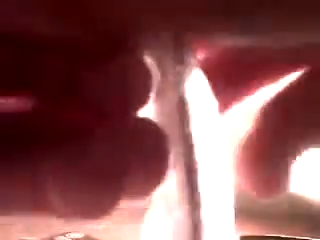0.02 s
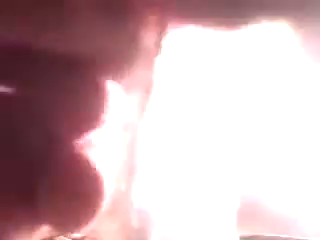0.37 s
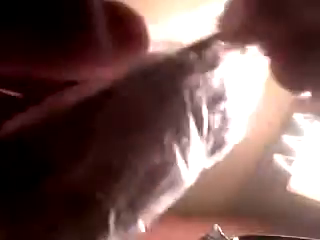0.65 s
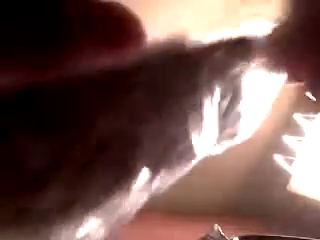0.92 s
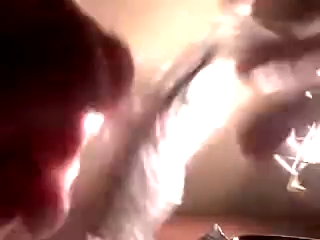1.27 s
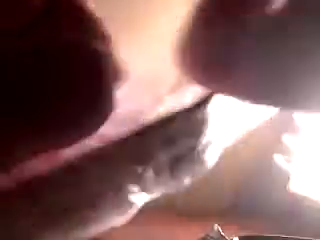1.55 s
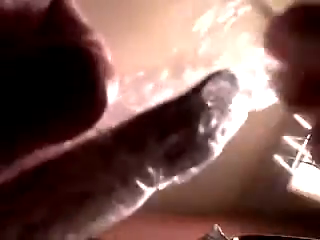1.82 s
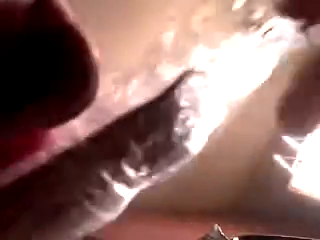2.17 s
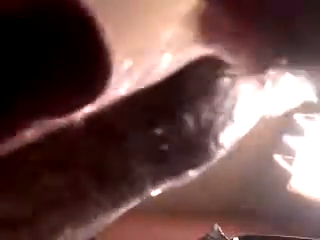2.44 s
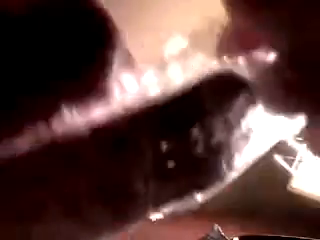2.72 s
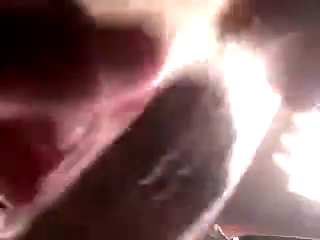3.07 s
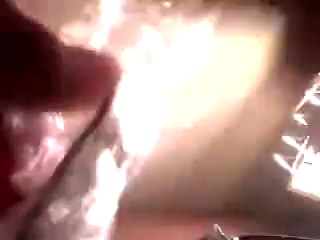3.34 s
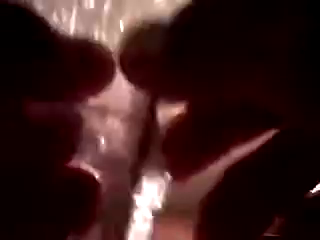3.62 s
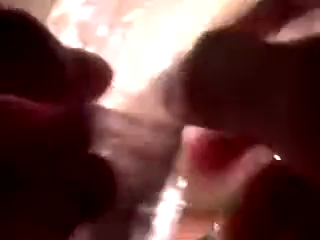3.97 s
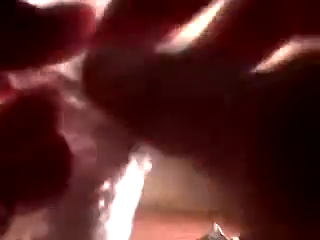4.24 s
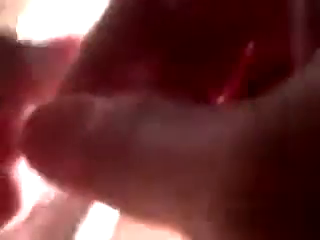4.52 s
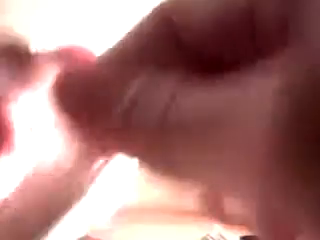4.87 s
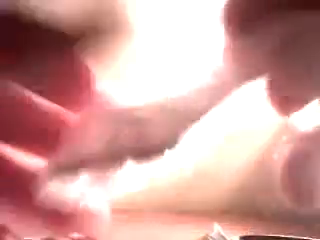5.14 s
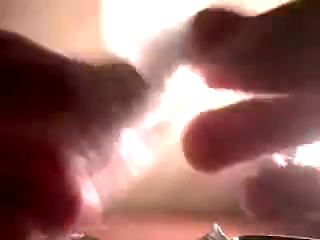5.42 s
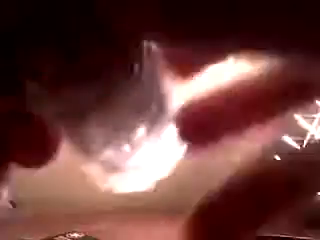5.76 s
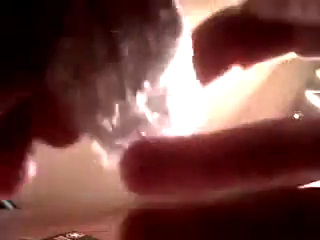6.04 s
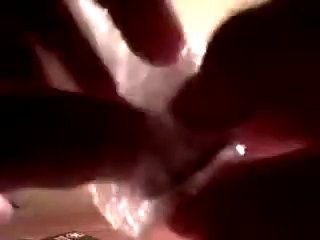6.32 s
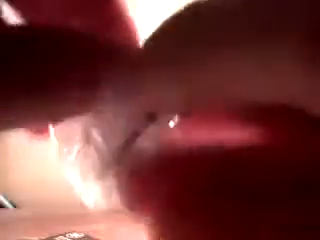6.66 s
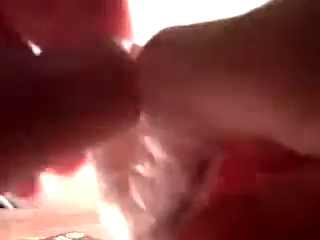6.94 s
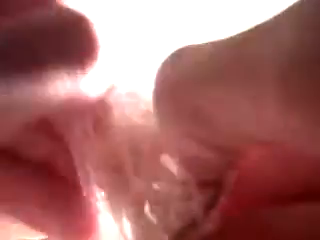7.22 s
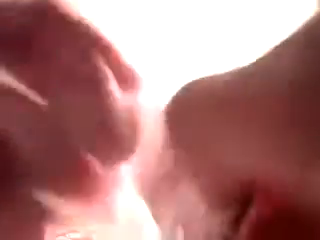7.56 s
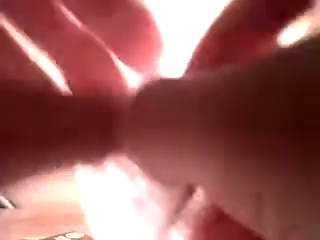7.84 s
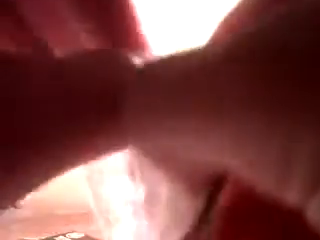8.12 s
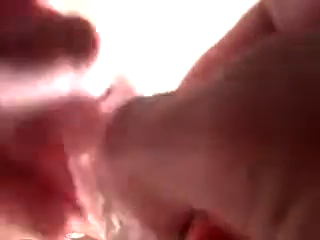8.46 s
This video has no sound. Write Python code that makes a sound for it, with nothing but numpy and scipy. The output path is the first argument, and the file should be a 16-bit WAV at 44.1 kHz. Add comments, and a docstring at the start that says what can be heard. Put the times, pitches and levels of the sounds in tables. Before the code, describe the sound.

Fingers work a clear plastic wrapper open very close to a small microphone. From the start, short uneven pulls make a fine crackle that swells and fades, with sharp snaps as creases flip and a light rustle in between. Loud clusters of snaps come at about 0.7, 1.2 and 1.5 seconds. The crinkling continues in quick bursts, a few snaps carrying a soft low pop, then eases briefly near 4.2 seconds. The pulling resumes, with another loud cluster at 5.2 seconds, busy crackling from about 6.4 to 7.4, and a strong snap at 7.8. The plastic keeps rustling until the end, at around 8.6 seconds. The room is quiet, with only a faint short echo and a steady low rumble. The microphone adds a slight ring in the upper middle range and cuts off the highest treble.

```python
"""Fingers work a plastic wrapper open close to a small microphone, in a quiet room.
From the start, each pull bends tiny patches of the sheet, so a crackle swells and fades.
Creases flip with sharp snaps, in loud clusters near 0.7 s and 1.2 s. The pulls go on, ease off
near 4.2 s, bring more loud snaps at 5.2 s and 7.8 s, and keep the sheet rustling to the end.
All along there is a faint echo and rumble; the microphone rings near 2 kHz and loses the top treble."""
import sys
import numpy as np
from scipy import signal
from scipy.fft import rfft, irfft
from scipy.io import wavfile
from scipy.ndimage import uniform_filter1d

SR = 44100
rng = np.random.default_rng(int(sys.argv[2]) if len(sys.argv) > 2 else 0)


def dump(signal):
    """Clip the signal to [-1, 1] and save it as 16-bit WAV at the path in sys.argv[1]."""
    limited = np.clip(np.atleast_2d(signal).T, -1, 1)
    pcm = np.round(limited * 32767).astype(np.int16)
    wavfile.write(sys.argv[1], SR, pcm)


N = 379260   # 8.6 s

# The main creases flipping, one per row. Levels are relative; the pop is the low thud under the snap.
# Columns: start_s, level_db, pitch_hz, pop_level_db
BIG_SNAPS = [(0.1374, -29.5, 1980, -83), (0.1963, -34.5, 3360, -73), (0.2283, -32, 2980, -82),
             (0.277, -46.0, 1150, -70.0), (0.4449, -31.5, 1930, -60), (0.523, -34, 3300, -83),
             (0.5534, -42.0, 1460, -70), (0.5561, -32, 2540, -82), (0.6257, -31, 3010, -70),
             (0.6402, -29.5, 2240.0, -72), (0.6475, -19, 1610, -64), (0.6574, -20.5, 2780, -76),
             (0.6881, -21.5, 1950.0, -55.5), (0.7379, -35, 2680, -71), (0.7824, -26, 2850, -78),
             (0.8776, -33.5, 3150.0, -81), (0.9285, -39.5, 2300, -72), (1.0734, -34, 2870.0, -74),
             (1.1333, -39, 1400, -69), (1.1757, -28, 2390, -66), (1.1844, -26, 2040, -47),
             (1.1918, -20.0, 1800.0, -55), (1.3258, -54.5, 1040.0, -73), (1.468, -33, 3000.0, -68),
             (1.4745, -28, 2430, -64), (1.4813, -21, 3630, -54), (1.6393, -53.5, 1100.0, -75),
             (1.7266, -31, 2830.0, -67.0), (1.82, -33, 2890.0, -78), (1.8922, -26.5, 2750, -67.5),
             (1.9176, -26.5, 2660, -51.5), (1.9283, -28, 2560.0, -64.0), (1.9887, -32.5, 2600.0, -60.5),
             (2.0273, -31.5, 2890.0, -81), (2.0894, -31, 2260, -48.5), (2.2663, -32, 2080.0, -54.5),
             (2.2911, -35.5, 2600, -55.5), (2.5218, -38, 2630, -46), (2.5273, -25.5, 2250, -67),
             (2.6062, -29.5, 2490.0, -59), (2.6356, -36.5, 2790.0, -80), (2.6859, -32.5, 2690.0, -77),
             (2.7036, -27.5, 2120, -74), (2.7344, -24, 2210, -77), (2.7508, -28, 2480.0, -72),
             (2.7652, -32, 2620.0, -70), (2.8231, -30.5, 2480, -68), (2.8667, -39, 4400.0, -80),
             (3.0256, -31, 3060, -78.0), (3.0805, -33.5, 3270, -83), (3.154, -31, 2400.0, -48.5),
             (3.1701, -34.5, 2060.0, -58), (3.1969, -33.5, 2710, -72.0), (3.2227, -39, 2650.0, -75.0),
             (3.2303, -27, 2150, -74), (3.2754, -30, 2230, -74), (3.3124, -27, 1950.0, -43.0),
             (3.3603, -25, 2550, -62), (3.4215, -33, 2850, -72), (3.4835, -35, 2020, -69),
             (3.814, -29.5, 2650.0, -78), (3.8468, -27.5, 3620.0, -72), (3.9371, -44.0, 1430, -72),
             (4.0037, -29, 2360, -82), (4.017, -28.5, 3000, -86), (4.0617, -22.5, 2180, -63),
             (4.4253, -43.5, 1340, -66), (4.443, -34.5, 2460.0, -61), (4.4918, -28.5, 1950.0, -47.5),
             (4.5195, -31, 3050.0, -69), (4.646, -37, 2100.0, -70), (4.6555, -31.5, 3170.0, -81),
             (4.7154, -33, 3070.0, -75), (4.7264, -34, 2660, -75), (4.7625, -38, 2750.0, -75.0),
             (4.7793, -32.5, 1270, -54.5), (4.788, -27.5, 2600, -77), (4.815, -31, 1950.0, -56),
             (4.8283, -32, 2870.0, -71), (4.9217, -33.5, 1710, -74), (5.0106, -34, 2950, -75),
             (5.1058, -36.5, 2630.0, -75.0), (5.1299, -30.5, 2260.0, -53), (5.1504, -26, 2510, -80),
             (5.1801, -18.5, 2380, -42.0), (5.1914, -22, 2480, -41.5), (5.2054, -26, 2190.0, -55.5),
             (5.4506, -33.5, 2560, -51), (5.5766, -26.5, 3020, -51.5), (5.6395, -31.5, 4300, -77),
             (5.748, -32.5, 3550.0, -82), (5.7945, -31, 3530, -71), (5.835, -40, 2750.0, -76),
             (5.8993, -32.5, 3550, -82), (5.927, -37, 3700, -75), (5.9606, -32.5, 3330, -86),
             (6.0068, -32, 2160, -77), (6.076, -38.5, 2100.0, -80), (6.1554, -29.5, 2780, -78.0),
             (6.329, -37, 2390, -79), (6.3377, -31.5, 2340.0, -77), (6.423, -35, 2150.0, -61),
             (6.4416, -26, 2330.0, -61), (6.4488, -26.5, 3200, -75), (6.4639, -27, 2350.0, -73),
             (6.497, -30, 2200.0, -70.0), (6.5266, -36, 2930.0, -72), (6.5461, -27, 2860.0, -71),
             (6.5554, -43.5, 1150, -71.5), (6.7878, -32, 2750.0, -77.0), (6.7969, -34, 2840.0, -80),
             (6.8608, -26, 2900, -73), (6.8706, -23.5, 2970, -84), (6.921, -34, 2400.0, -76),
             (6.981, -37, 2280.0, -72), (7.0223, -30, 3800, -81), (7.0779, -33, 3340, -83),
             (7.1939, -34, 1940, -71.0), (7.2161, -38, 2880, -75), (7.2582, -30, 2720.0, -62),
             (7.3335, -22.5, 2330, -74.0), (7.3425, -34, 2460.0, -73), (7.357, -25.5, 2200, -72),
             (7.3956, -34, 3870, -71), (7.5171, -32.5, 2500, -75.0), (7.6039, -29, 2520.0, -78),
             (7.6161, -29, 2600, -64), (7.6341, -32, 2670.0, -72), (7.7183, -32, 2200, -74),
             (7.7482, -31.5, 2620.0, -65.5), (7.7833, -31, 2620.0, -80), (7.8091, -18, 2100, -48),
             (7.8302, -26, 2920.0, -71), (7.854, -33, 2780.0, -74.0), (7.8741, -27, 2750, -75.0),
             (7.8787, -24.5, 2460, -79), (7.9114, -35, 2700.0, -75), (7.9407, -27.5, 2400.0, -70),
             (8.062, -36.5, 2430, -81), (8.1753, -32, 2760, -73), (8.4399, -27, 2700, -67),
             (8.5077, -26.5, 2830, -77.0), (8.5251, -31, 3000, -78)]


def snaps(rows, band_ratio=1.608, flutter=0.22):
    """A crease flips: one click, a few ms of waves bouncing about the sheet, and a low pop of air."""
    out, t = np.zeros(N), np.arange(1300) / SR
    click = t == 0
    onset = t < 0.004   # each part's level is set over its first 4 ms
    noises = rng.standard_normal((len(rows), 3, len(t)))
    for (start_s, level_db, pitch_hz, pop_level_db), (waves, grains, sway) in zip(rows, noises):
        kick = click * np.sign(waves[0]) + flutter * waves * swell(t, peak_s=0.0012)
        # the size of the flipping patch sets the pitch at which it briefly rings
        snap = band(kick, pitch_hz / band_ratio, pitch_hz * band_ratio, order=3)
        snap = resonance(snap, pitch_hz, width_hz=600, gain_db=8)
        # the jolt spreads and sets off tiny wrinkles a moment later
        fizz = band(grains * swell(t, peak_s=0.0026), 2600, 5800)
        pop = band(click + flutter * sway * swell(t, peak_s=0.0022), 160, 1000)
        for part, part_db in (snap, level_db - 2.4), (fizz, level_db - 20.5), (pop, pop_level_db + 4):
            add(out, start_s, from_db(part_db) * part / np.std(part[onset]))
    return out


def small_snap_rows(crease_strength, count=80):
    """Small creases give way at random, louder when the sheet is worked harder; rows like BIG_SNAPS."""
    at = ((np.arange(count) + rng.random(count)) * (N - 1) / count).astype(int)
    scatter_db, scatter_octaves = (rng.standard_normal((count, 2)) * [2.5, 0.23]).T
    level_db = 20 * np.log10(crease_strength[at]) + 4.5 + scatter_db
    pitch_hz = 2650 * 2 ** scatter_octaves
    return np.transpose([at / SR, level_db, pitch_hz, level_db - 34])


# Each pull or squeeze, and how hard it works the creases, broad folds and tiny wrinkles.
# Columns: start_s, length_s, creases_db, folds_db, wrinkles_db
PULLS = [(0.052, 0.024, -35.5, -67.5, -42), (0.112, 0.1, -49.5, -62.5, -52), (0.262, 0.037, -41, -56, -45),
         (0.434, 0.14, -43, -62.5, -45), (0.544, 0.19, -38.5, -55, -42.5), (0.754, 0.4, -41.5, -68, -45),
         (1.123, .11, -39, -61, -45), (1.165, 0.019, -32, -46.5, -35.5), (1.312, 0.017, -56, -74, -71),
         (1.463, 0.028, -31.5, -43.5, -38), (1.605, 0.025, -50, -67, -55.5),
         (1.713, 0.025, -32.5, -48.5, -42), (1.806, 0.045, -37, -50, -41),
         (1.855, 0.053, -30.5, -41.5, -38.5), (1.994, 0.082, -41, -52.5, -44), (2.141, 0.11, -47, -70, -46),
         (2.234, 0.071, -39.5, -51.5, -44.5), (2.505, .035, -34.5, -46, -46),
         (2.584, 0.18, -41.5, -54.5, -46.5), (2.712, 0.086, -35, -50, -37.5),
         (2.958, 0.021, -43.5, -62, -45), (3.058, 0.06, -42.5, -58.5, -50), (3.122, 0.048, -38.5, -51, -49),
         (3.206, 0.15, -38, -49, -43), (3.424, 0.15, -46.5, -54, -47), (3.725, 0.029, -42, -58, -46.5),
         (3.793, 0.073, -36.5, -49.5, -39), (3.91, 0.046, -36.5, -54, -43.5), (3.993, .09, -42, -54, -46),
         (4.147, 0.058, -61, -63.5, -55.5), (4.287, 0.15, -49, -83, -69), (4.412, 0.022, -35, -46, -45),
         (4.47, 0.12, -40.5, -57, -46.5), (4.613, .07, -35.5, -53, -41), (4.713, 0.15, -42, -54.5, -46),
         (4.886, 0.1, -42, -60.5, -45), (5.078, 0.14, -38.5, -56.5, -49), (5.412, 0.043, -40.5, -61, -62),
         (5.528, 0.12, -36, -56.5, -41), (5.703, 0.13, -42, -64, -42.5), (5.908, 0.11, -40, -63, -40),
         (6.023, 0.1, -47, -66, -47.5), (6.252, 0.26, -41, -64, -40.5), (6.4, 0.051, -38, -45, -38),
         (6.497, 0.068, -37.5, -50.5, -41), (6.69, 0.12, -35.5, -60, -40.5), (6.841, 0.076, -39, -53, -37),
         (6.919, 0.15, -38.5, -61, -42), (7.194, 0.067, -32.5, -49.5, -38.5),
         (7.323, 0.058, -37.5, -63, -45), (7.433, 0.042, -39.5, -64, -44), (7.534, .1, -43.5, -66, -49.5),
         (7.763, 0.12, -34.5, -51.5, -43.5), (7.916, 0.012, -32, -52.5, -38.5),
         (8.038, 0.016, -48, -63, -47), (8.142, 0.038, -36, -53, -41), (8.21, 0.34, -44.5, -75, -53),
         (8.407, 0.12, -38.5, -53, -43)]
# The light rustle of just holding the sheet. Columns: time_s, relative_level_db
GRIP = [(0, -58.5), (.4, -52), (1.4, -55), (1.68, -58.5), (2.1, -48), (2.48, -85), (2.9, -57),
        (3.68, -52.5), (4.2, -55.5), (5.0, -53), (5.35, -60), (6.2, -53.5), (6.65, -47), (7.15, -51.5),
        (8.1, -47.5), (8.6, -42.5)]


def finger_pulls(rise_s=0.014, release_db_per_s=296, settle_db=-15, settle_db_per_s=72):
    """Strength of creases, folds and wrinkles over time: pulls come and go on top of a light grip."""
    t = np.arange(N) / SR
    grip_db = np.interp(t, *np.transpose(GRIP))
    share_db = np.array([0.5, -17.5, 0.5])   # creases, folds, wrinkles
    power = from_db(grip_db + share_db[:, None]) ** 2
    for start_s, length_s, *levels_db in PULLS:
        span = slice(int(start_s * SR), int((start_s + length_s + 0.5) * SR))
        age_s = t[span] - start_s
        released_s = np.maximum(age_s - length_s, 0)
        # the fingers let go quickly, then the sheet settles faintly and more slowly
        fall_db = np.maximum(-release_db_per_s * released_s, settle_db - settle_db_per_s * released_s)
        envelope = np.clip(age_s / rise_s, 0, 1) * from_db(fall_db)
        power[:, span] += (from_db(levels_db)[:, None] * envelope) ** 2
    return np.sqrt(power)


def buckles(low_hz, high_hz, per_s, unevenness_db, tilt_db, clumps, rub, bands=7):
    """Tiny patches of the sheet give way, each with a tick, over the smooth rub of plastic on skin."""
    happens = rng.random(N) < per_s * clumps / SR
    sizes = from_db(unevenness_db * np.minimum(rng.exponential(1, N), 3))
    ticks = rms_one(happens * sizes * rng.choice([-1, 1], N))
    tick_band = rng.integers(0, bands, N)
    out = rub * band(rng.standard_normal(N), low_hz, high_hz, order=3)
    for k, hz in enumerate(np.geomspace(low_hz, high_hz, bands)):
        # patches of one size come and go as the sheet folds, so each clump has its own tone
        gain = from_db(tilt_db * k / bands + 4.5 * drift(50))
        out += band(gain * ticks * (tick_band == k), hz / 1.135, hz * 1.082)
    return even_level(out)


def crackle(creases, folds, wrinkles):
    """One buckle sets off its neighbours, so ticks come in clumps; tiny wrinkles clump on their own."""
    clumps = from_db(4.5 * drift(130))
    fine_clumps = from_db(5.5 * drift(150))
    sway = buckles(200, 631, per_s=320, unevenness_db=2.5, tilt_db=13, clumps=clumps, rub=0.26)
    broad = buckles(839, 1573, per_s=800, unevenness_db=4.5, tilt_db=22.5, clumps=clumps, rub=0.1)
    middle = buckles(1870, 3540, per_s=1100, unevenness_db=4.5, tilt_db=0, clumps=clumps, rub=0.53)
    tiny = buckles(4094, 6500, per_s=2000, unevenness_db=0, tilt_db=-11.5, clumps=fine_clumps, rub=0.16)
    low = folds * (from_db(-0.5) * broad + from_db(-19) * sway)
    high = from_db(-4.5) * (creases * middle + wrinkles * tiny)
    return low + high


def cross_sheet(x, hz=4300, width_hz=2400, passes=4):
    """Waves cross the sheet at different speeds: each tick's treble arrives about a millisecond late."""
    radius = np.exp(-np.pi * width_hz / SR)
    feedback = np.array([1, -2 * radius * np.cos(2 * np.pi * hz / SR), radius ** 2])
    for _ in range(passes):
        x = signal.lfilter(feedback[::-1], feedback, x)   # changes timing, not loudness
    return x


def room_echo(x, level_db=-21, fade_s=0.14, gap_s=0.0024, count=4):
    """Faint echoes come off the table and walls; their pattern shifts as the sheet moves about."""
    t = np.arange(SR // 3) / SR
    noise = band(rng.standard_normal((count, len(t))), 150, 5700, order=1)
    tails = noise * from_db(-60 * t / fade_s) * (t > gap_s)
    shares = np.array([drift(6) for _ in tails])
    shares /= np.linalg.norm(shares, axis=0)
    echoes = [signal.oaconvolve(x * share, tail / np.linalg.norm(tail))[:N]
              for share, tail in zip(shares, tails)]
    return from_db(level_db) * sum(echoes)


# How strong the background noise is from low to high. Columns: pitch_hz, relative_level_db
BACKGROUND_TONE = [(25, 10), (45, -4), (60, 4), (80, 0.5), (120, -2), (190, 0.5), (330, -5.5), (500, -5),
                   (1000, -16), (2500, -38), (7000, -24.5)]


def background(level_db=-67.5):
    """A steady low rumble and faint hiss."""
    pitch_hz, relative_db = np.transpose(BACKGROUND_TONE)
    all_hz = np.arange(N // 2 + 1) * SR / N
    shape = from_db(np.interp(np.log(all_hz + 1), np.log(pitch_hz), relative_db))
    noise = irfft(rfft(rng.standard_normal(N)) * shape, N)
    return from_db(level_db) * rms_one(noise)


def from_db(db):
    """Turn decibels into a number to multiply by."""
    return 10 ** (np.asarray(db) / 20)


def rms_one(x):
    """Scale a sound so its average level (rms) is 1."""
    return x / np.sqrt(np.mean(x ** 2) + 1e-20)


def even_level(x, span_s=0.028):
    """Hold the level near 1 from moment to moment, while single ticks still stand out."""
    power = np.abs(uniform_filter1d(x ** 2, int(span_s * SR)))
    return x / np.sqrt(power + 1e-12)


def band(x, low_hz, high_hz, order=2):
    """Keep the pitches between low_hz and high_hz."""
    return signal.sosfilt(signal.butter(order, [low_hz, high_hz], "band", fs=SR, output="sos"), x + 1e-18)


def resonance(x, hz, width_hz, gain_db):
    """Boost the sound around one pitch, or cut it if gain_db is negative."""
    angle, height = 2 * np.pi * hz / SR, from_db(gain_db / 2)
    width = np.sin(angle) * width_hz / hz / 2
    forward = [1 + width * height, -2 * np.cos(angle), 1 - width * height]
    feedback = [1 + width / height, -2 * np.cos(angle), 1 - width / height]
    return signal.lfilter(forward, feedback, x)


def swell(t, peak_s):
    """A curve that rises until peak_s, then dies away."""
    return t / peak_s * np.exp(-t / peak_s)


def drift(per_s):
    """Wander around zero, heading for a new random value per_s times a second."""
    targets = rng.standard_normal(4096)
    return rms_one(np.interp(np.arange(N) / SR * per_s, np.arange(len(targets)), targets))


def add(out, start_s, sound):
    """Mix a sound in at start_s."""
    at = round(start_s * SR)
    out[at:at + len(sound)] += sound[:N - at]


def scene():
    """The wrapper snaps and crackles close up, with a little room behind it."""
    creases, folds, wrinkles = finger_pulls()
    snapping = snaps([*BIG_SNAPS, *small_snap_rows(creases)])
    wrapper = cross_sheet(snapping + crackle(creases, folds, wrinkles))
    return (wrapper + room_echo(wrapper) + background())[None]


# The pitches that the microphone's case boosts or cuts. Columns: pitch_hz, width_hz, gain_db
MICROPHONE_CASE = [(316, 86, 2.5), (650, 110, -0.5), (837, 360, 7.5), (1950, 192, 6.5), (3070, 220, 4),
                   (4160, 190, 3.5), (3975, 42, -17)]


def record(dry):
    """The microphone's case rings at a few pitches, and the highest treble is cut off sharply."""
    for pitch_hz, width_hz, gain_db in MICROPHONE_CASE:
        dry = resonance(dry, pitch_hz, width_hz, gain_db)
    cutoff_hz = 7300
    return signal.sosfilt(signal.ellip(10, 0.3, 75, cutoff_hz, fs=SR, output="sos"), dry)


dry = scene()
out = record(dry)
dump(out)
```